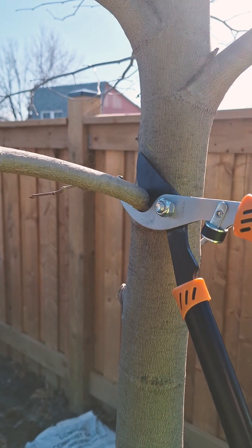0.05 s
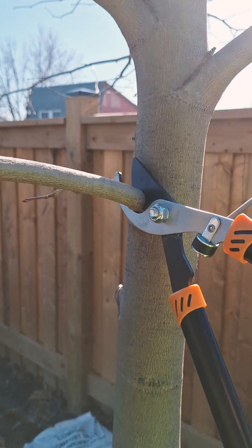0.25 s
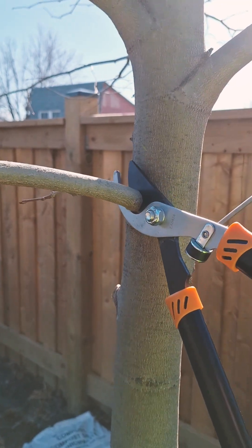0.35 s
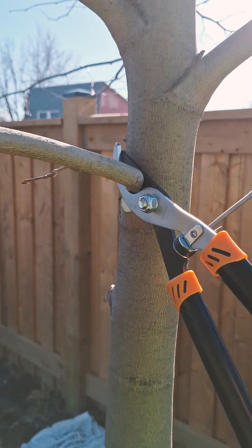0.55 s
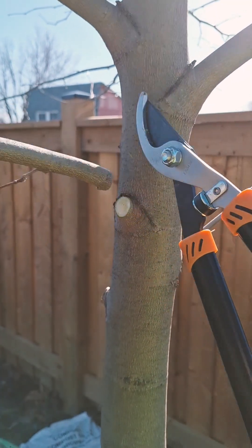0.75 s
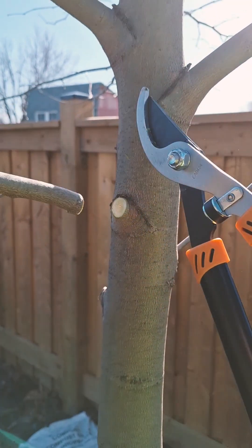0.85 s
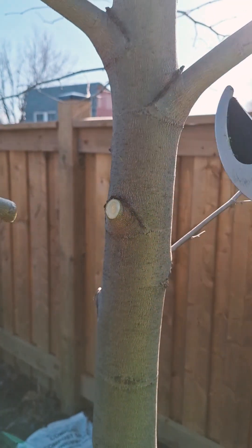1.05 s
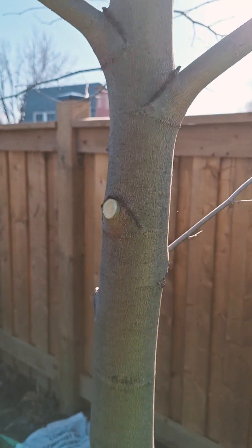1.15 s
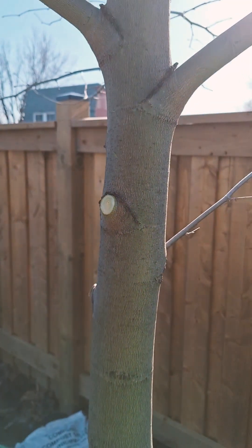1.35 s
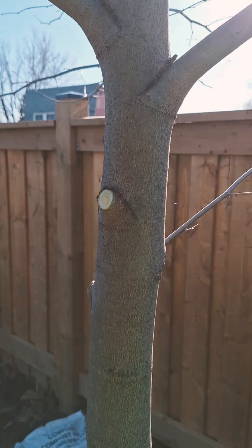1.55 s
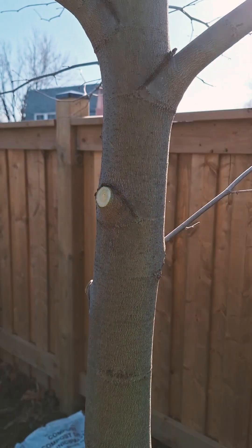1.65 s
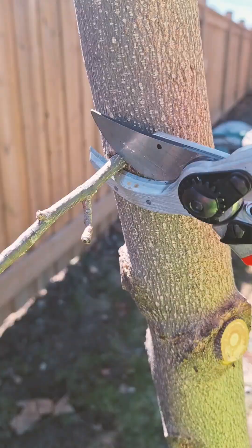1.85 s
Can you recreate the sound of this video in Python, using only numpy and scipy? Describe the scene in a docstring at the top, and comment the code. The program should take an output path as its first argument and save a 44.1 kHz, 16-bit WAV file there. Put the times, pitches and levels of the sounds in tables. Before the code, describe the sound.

In a garden, close-up loppers bite through a thin branch with a rising crunch, a sharp crack and a brief shudder. A wooden knock follows as it drops, then soft sleeve rustle and two small ticks over faint wind.

```python
"""Sleeves rustle over a light wind rumble, soft handling bumps and a far-off machine hum in a garden.
Hand loppers bite into a small tree: the wood crunches and rings higher under the blade, the last
fibres tear and crack, and the jaws snap shut with a shudder. The branch drops with a wooden knock.
Cloth swishes over cloth as the loppers are drawn away, and two small wooden ticks end the scene."""
import sys
import numpy as np
from scipy import signal
from scipy.fft import rfft, irfft
from scipy.io import wavfile

SR = 44100
rng = np.random.default_rng(int(sys.argv[2]) if len(sys.argv) > 2 else 0)


def transcribe(signal):
    """Save signal, clipped to [-1, 1], as a 16-bit WAV file at the path in sys.argv[1]."""
    frames = np.atleast_2d(signal).T
    limited = np.clip(frames, -1, 1)
    pcm = np.round(limited * 32767).astype(np.int16)
    wavfile.write(sys.argv[1], SR, pcm)


N = 83790
T = np.arange(N) / SR

# wind rumble envelope: t/s, level/dB
WIND_ENV = [(0, -60), (.1, -55), (.45, -56.5), (.63, -48), (.84, -65), (.95, -58.5), (1.45, -53),
            (1.71, -52.5), (1.77, -73.5), (1.9, -60)]
# wind rumble tone: f/Hz, level/dB
WIND_EQ = [(25, -20), (40, -25), (55, -12.5), (95, 3.5), (140, -8.5), (220, -14), (400, -33.5),
           (1500, -56.5)]
# distant ambience envelope: t/s, level/dB
AIR_ENV = [(0, -60), (.3, -60), (.8, -65.5), (.95, -61), (1.65, -61.5), (1.8, -64), (1.9, -68)]
# distant ambience tone: f/Hz, level/dB
AIR_EQ = [(60, -6.5), (200, -3), (450, -7.5), (1300, -12), (2600, -17), (7000, -10.5), (9500, -20.5),
          (15500, -20)]
# light brushes of cloth, twigs, bark and splinters: t/s, level/dB, length/s, centre f/Hz
BRUSHES = [(-.08, -61, 0.36, 6300), (-.08, -62, 0.43, 12900), (.088, -44, .008, 5500),
           (.089, -48.5, 0.0066, 11300), (.098, -46.5, .007, 5600), (0.303, -50, 0.0056, 14000),
           (0.605, -42.5, 0.033, 13500), (0.849, -51, 0.032, 3290), (0.854, -55.5, 0.042, 4540),
           (1.07, -53, 0.065, 3220), (1.405, -56, 0.046, 2580), (1.465, -52.5, .06, 3380)]
# handling bumps on the phone: t/s, level/dB, half length/s, left minus right/dB
BUMPS = [(0.071, -47.5, 0.0057, 22), (0.339, -53.5, .02, -26), (1.002, -46.5, .013, 22),
         (1.16, -46.5, 0.017, 27), (1.312, -40.5, 0.016, 15)]
# sleeve swings: peak t/s, level/dB, rise/s, fall/s
SWINGS = [(0.117, -53, 0.023, 0.18), (0.254, -46, 0.023, 0.029), (.43, -48, 0.1, 0.22),
          (.68, -51.5, 0.06, 0.092), (1.138, -45, 0.1, 0.21), (1.50, -47.5, 0.06, 0.062),
          (1.60, -47.5, 0.052, 0.076)]
# sleeve swish tone: f/Hz, level/dB
SLEEVE_EQ = [(200, -12), (500, -10.5), (1400, -6.5), (2000, 1), (2800, -3), (4200, -5), (7500, -5),
             (8900, -15.5), (12000, -13.5), (15500, -15)]
# rasp of the weave, its pitch wandering between about 2 and 3 kHz: t/s, level/dB, f/Hz
RASP = [(.2, -84, 2000), (.39, -57, 1990), (.50, -46.5, 2180), (.555, -36, 2030), (.66, -58, 2000),
        (.82, -70, 1980), (.96, -84, 2300), (1.04, -58, 2540), (1.11, -47, 2980), (1.17, -49, 1950),
        (1.25, -49, 2000), (1.35, -63, 2110), (1.435, -54, 2630), (1.479, -58, 2280), (1.55, -51, 2010),
        (1.66, -60, 1980), (1.77, -91, 1900)]
# envelope of the blade crushing the wood: t/s, level/dB
CRUSH_ENV = [(.19, -100), (.218, -80), (.232, -55.5), (.275, -55), (.305, -55), (.345, -61), (.368, -51),
             (.415, -57), (.45, -52), (.50, -59), (.56, -55), (.63, -100)]
# ring of the wood under the blade: t/s, f/Hz
CRUSH_PITCH = [(.23, 564), (.265, 680), (.30, 1030), (.45, 1120), (.55, 1220)]
# small wooden ticks: t/s, level/dB, f/Hz, t60/s
TICKS = [(.2275, -37, 590, .035), (.2824, -25, 1680, 0.0063), (0.2834, -30, 3600, .003),
         (0.359, -35, 1060, 0.004), (.449, -35, 1030, .02), (.650, -37, 600, .012),
         (0.6512, -33, 2870, .004), (1.643, -38, 1300, 0.0087), (1.676, -39, 970, .010)]
# envelope of the last fibres tearing: t/s, level/dB
TEAR_ENV = [(.33, -100), (.45, -58.5), (.50, -48), (.535, -43), (.56, -39), (.571, -28.5), (.577, -34),
            (.580, -39), (.587, -41.5), (.598, -37), (.606, -43), (.620, -44.5), (.637, -45.5),
            (.69, -53.5), (.76, -72), (.84, -100)]
# tearing tone: f/Hz, level/dB
TEAR_EQ = [(150, -11.5), (500, -3), (1200, -1.5), (2000, 0), (3500, -4.5), (6200, 1.5), (7500, -1.5),
           (9000, -15.5), (12000, -6), (15500, -12.5)]
# sharp cracks of the break: t/s, level/dB, t60/s, left minus right/dB
CRACKS = [(0.5078, -35, 0.0065, 7), (0.5745, -20, 0.0099, 6.5), (0.5767, -23, .006, -7),
          (0.5997, -19.5, .011, 1)]
# crack tone: f/Hz, level/dB
CRACK_EQ = [(400, -16), (1700, 3.5), (4000, 0), (6200, -5), (7600, 3), (9200, -17), (12000, -11),
            (15500, -7)]
# envelope of tool and trunk shuddering as the branch lets go: t/s, level/dB
SHUDDER_ENV = [(.53, -63), (.572, -46.5), (.597, -38), (.603, -35.5), (.632, -38.5), (.642, -41.5),
               (.67, -46.5), (.74, -62.5), (.80, -67)]
# shudder tone: f/Hz, level/dB
SHUDDER_EQ = [(80, -25.5), (170, 3), (300, -2.5), (560, -4), (800, -2.5), (1300, -0.5), (2400, -8.5),
              (6000, -13.5), (15000, -39)]
# the jaws hit their stop and bounce: t/s, level/dB
JAW_HITS = [(.6006, -30), (.6078, -34.5)]
# ring of the loppers: f/Hz, level/dB, t60/s
LOPPER_MODES = [(191, -15.5, 0.36), (384, -12.5, 0.075), (528, -10, 0.17), (598, -20.5, 0.26),
                (980, -6.5, .03), (1200, -26, .04), (1440, -15, 0.056), (1625, -8, 0.033), (1887, -3, .09),
                (1925, -9, .08), (2062, -22, .10), (2980, -20, .05), (3750, -24, .04)]
# the branch lands and settles: t/s, level/dB
LANDINGS = [(.7698, -25), (.7779, -36.5)]
# ring of the branch: f/Hz, level/dB, t60/s
BRANCH_MODES = [(463, -18, 0.042), (905, -14.5, 0.073), (1520, -17, 0.049), (1060, -2.5, 0.019),
                (1884, -12.5, 0.076), (1154, -10, 0.06), (2820, -16, 0.071), (3520, -20, 0.096),
                (4050, -15, 0.018)]
# its dull push on the ground: f/Hz, level/dB, t60/s
THUD_MODES = [(203, -33, 0.052), (266, -36.5, 0.089)]
# tone of its scuff on the ground: f/Hz, level/dB
SCUFF_EQ = [(80, -38), (220, -8), (600, -17), (1100, 1.5), (2400, -0.5), (3500, 3.5), (4700, -2),
            (6000, -8), (15000, -20)]
# tone of the fence and ground reflections: f/Hz, level/dB
FENCE_EQ = [(150, 6.5), (400, 6), (1500, 3.5), (5000, -2), (12000, 3.5)]

MONO_BELOW_HZ, MIC_LAG_S = 740, 0.000058


def from_db(db):
    return 10 ** (np.asarray(db) / 20)


def unit_rms(x):
    return x / np.sqrt(np.mean(x ** 2) + 1e-20)


def curve(rows):
    return np.interp(T, *np.transpose(rows))


def pan(db):
    """Stereo gains; positive leans left."""
    return from_db(np.array([[db], [-db]]) / 2)


def decay(start, t60):
    """Instant attack, exponential tail."""
    return (T >= start) * 1e-3 ** (np.maximum(T - start, 0) / t60)


def filtered(x, hz, kind="band", order=2):
    return signal.sosfilt(signal.butter(order, hz, kind, fs=SR, output="sos"), x)


def eq(x, points):
    """Minimum-phase EQ that keeps the power of white noise."""
    size = 4096
    hz, db = np.transpose(points)
    bin_hz = np.arange(size // 2 + 1) * SR / size
    gain = unit_rms(from_db(np.interp(np.log(bin_hz + 1), np.log(hz), db)))
    cepstrum = irfft(np.log(gain))
    cepstrum[1:size // 2] *= 2
    cepstrum[size // 2 + 1:] = 0
    impulse = irfft(np.exp(rfft(cepstrum)))
    return signal.fftconvolve(x, impulse[None], axes=1)[:, :N]


def widen(x):
    """Three unrelated signals become a stereo pair: centred bass, wide treble."""
    return filtered(x[2], MONO_BELOW_HZ, "low", order=1) + filtered(x[:2], MONO_BELOW_HZ, "high", order=1)


def hiss():
    return widen(rng.standard_normal((3, N)))


def grains(per_s, size_db):
    """Stereo crackle of unevenly sized clicks; rms 1."""
    sizes = from_db(size_db * np.minimum(rng.exponential(1, (3, N)), 4))
    signs = rng.choice([-1, 1], (3, N))
    fires = rng.random((3, N)) < per_s / SR
    return unit_rms(widen(sizes * signs * fires))


def ring(start, hz, t60, lag_s=MIC_LAG_S):
    """One struck mode, reaching the right side a little later."""
    arrival = start + np.array([[0], [lag_s]])
    return decay(arrival, t60) * np.sin(2 * np.pi * hz * (T - arrival))


def struck(hits, modes, lag_s):
    """Every hit rings every mode, varied by about 1 dB on each side."""
    out = 0
    for start, hit_db in hits:
        for k, (hz, mode_db, t60) in enumerate(modes):
            gain = from_db(hit_db + mode_db + rng.standard_normal((2, 1)))
            out += gain * (-1) ** k * ring(start, hz, t60, lag_s)
    return out


def resonance(x, hz, width_hz):
    """A sweepable resonant peak; rms 1."""
    carrier = np.exp(2j * np.pi * np.cumsum(hz) / SR)
    pole = np.exp(-np.pi * width_hz / SR)
    return unit_rms((signal.lfilter([1], [1, -pole], x / carrier) * carrier).real)


def wind():
    """Light wind: a low rumble that swells and sinks."""
    return from_db(curve(WIND_ENV)) * eq(rng.standard_normal((2, N)), WIND_EQ) * pan(db=4.5)


def ambience(hum_hz=152.9):
    """A bed of distant air with the wavering hum of a far-off machine."""
    hum = from_db(1) * resonance(rng.standard_normal(N), np.full(N, hum_hz), width_hz=6.4)
    return from_db(curve(AIR_ENV)) * (filtered(hum, [125, 185]) + eq(hiss(), AIR_EQ))


def brushes(edge_ratio=1.272):
    """Cloth, twigs, bark and splinters graze in brief swells of bright hiss."""
    out = 0
    for start, db, length, hz in BRUSHES:
        swell = from_db(db) * np.sin(np.pi * np.clip((T - start) / length, 0, 1))
        out += swell * unit_rms(filtered(hiss(), [hz / edge_ratio, hz * edge_ratio]))
    return out


def handling_bumps(bump_hz=103.6):
    """Soft, low bumps on the phone, each well to one side."""
    out = 0
    for peak, db, half_length, pan_db in BUMPS:
        swell = from_db(db) * np.exp(-((T - peak) / half_length) ** 2)
        out += swell * pan(pan_db) * np.sin(2 * np.pi * bump_hz * (T - peak))
    return out


def sleeves(rasp_band_hz=(1750, 4200), sheen_above_hz=10700):
    """Cloth slides over itself: the swish swells and brightens with each swing, and the weave rasps."""
    speed = np.sqrt(sum(from_db(db) ** 2 * np.exp(-((T - peak) / np.where(T < peak, rise, fall)) ** 2)
                        for peak, db, rise, fall in SWINGS))
    swish = eq(speed * grains(per_s=18000, size_db=1), SLEEVE_EQ)
    sheen = filtered(hiss(), sheen_above_hz, "high", order=4)
    sheen *= from_db(-55) * (speed / speed.max()) ** 2
    times, rasp_db, rasp_hz = np.transpose(RASP)
    rasp = resonance(grains(per_s=3000, size_db=3.5), np.interp(T, times, rasp_hz), width_hz=800)
    rasp = filtered(filtered(rasp, rasp_band_hz), rasp_band_hz)
    rasp *= from_db(np.interp(T, times, rasp_db))
    return swish + sheen * pan(db=-8) + rasp * pan(db=4)


def crush(width_hz=160, overtone_ratio=1.176):
    """Fibres give way under the blade; the wood rings higher as the cut deepens."""
    slips = grains(per_s=900, size_db=4)
    hz = curve(CRUSH_PITCH)
    body = resonance(slips, hz, width_hz)
    overtone = from_db(0.5) * resonance(slips, hz * overtone_ratio, 2 * width_hz)
    return from_db(curve(CRUSH_ENV)) * filtered(body + overtone, [430, 3200])


def ticks():
    """Small wooden ticks, each one tightly damped mode."""
    return sum(from_db(db) * ring(start, hz, t60) for start, db, hz, t60 in TICKS)


def tear():
    """The last fibres rip in a dense crackle, flecked with single splinters."""
    fibres = grains(per_s=5000, size_db=2)
    splinters = from_db(-17) * grains(per_s=260, size_db=3)
    return eq(from_db(curve(TEAR_ENV)) * (fibres + splinters), TEAR_EQ)


def cracks():
    """The wood breaks in sharp, gritty bursts, each pinging the blade."""
    bursts = blade = 0
    for start, db, t60, pan_db in CRACKS:
        gain = from_db(db) * pan(pan_db)
        bursts += gain * decay(start, t60)
        blade += gain * from_db(-1.5) * ring(start, hz=7520, t60=0.0079)
    return blade + eq(bursts * grains(per_s=23000, size_db=3), CRACK_EQ)


def jaws():
    """The jaws hit their stop; handles, pivot and trunk ring and rattle."""
    rattle = from_db(curve(SHUDDER_ENV)) * grains(per_s=2500, size_db=3.5)
    return struck(JAW_HITS, LOPPER_MODES, lag_s=0.00012) + eq(rattle, SHUDDER_EQ)


def falling_branch(thud_at_s=0.7718, lag_s=0.0002):
    """The branch hits the ground: a wooden knock, a soft thud underneath and a short scuff on top."""
    knock = struck(LANDINGS, BRANCH_MODES, lag_s)
    thud = sum(from_db(db) * ring(thud_at_s, hz, t60, lag_s) for hz, db, t60 in THUD_MODES)
    scuff = from_db(-38) * decay(LANDINGS[0][0], t60=0.1) * grains(per_s=3000, size_db=2.5)
    return filtered(knock, [350, 5200]) + filtered(thud, [140, 420]) + eq(scuff, SCUFF_EQ)


def fence(x, predelay_s=0.005, wet_db=-17):
    """A short, wide scatter of reflections off fence and ground."""
    echoes = eq(rng.standard_normal((2, N)) * decay(predelay_s, t60=0.11), FENCE_EQ)
    return from_db(wet_db) * signal.fftconvolve(x, unit_rms(echoes) / np.sqrt(N), axes=1)[:, :N]


def scene():
    """The cut and the fall with their reflections, over a bed of wind, air, bumps and cloth."""
    bed = wind() + ambience() + brushes() + handling_bumps() + sleeves()
    action = crush() + ticks() + tear() + cracks() + jaws() + falling_branch()
    return bed + action + fence(action)


def record(dry, low_cut_hz=47, high_cut_hz=15860):
    """Roll off the sub-bass and cut the top steeply."""
    trimmed = filtered(dry, low_cut_hz, "high", order=4)
    high_cut = signal.firwin(601, high_cut_hz, fs=SR, window="blackman")
    return signal.fftconvolve(trimmed, high_cut[None], "same", axes=1)


dry = scene()
out = record(dry)
transcribe(out)
```